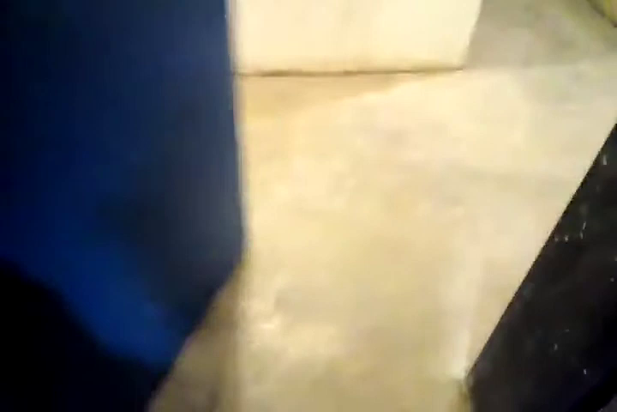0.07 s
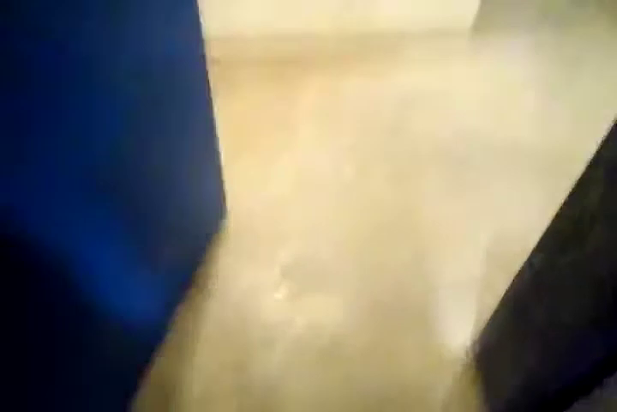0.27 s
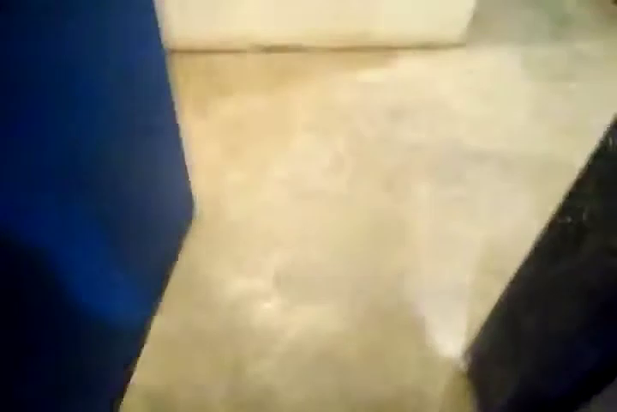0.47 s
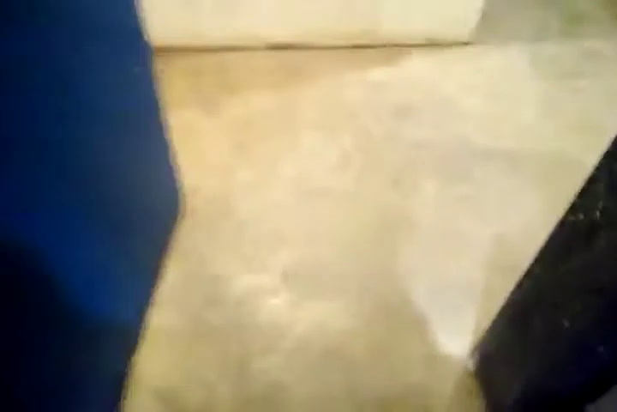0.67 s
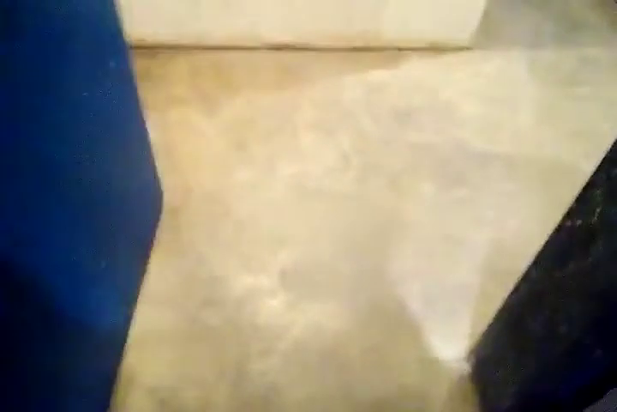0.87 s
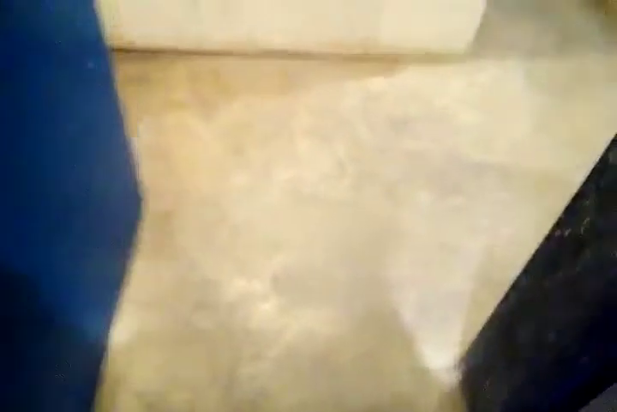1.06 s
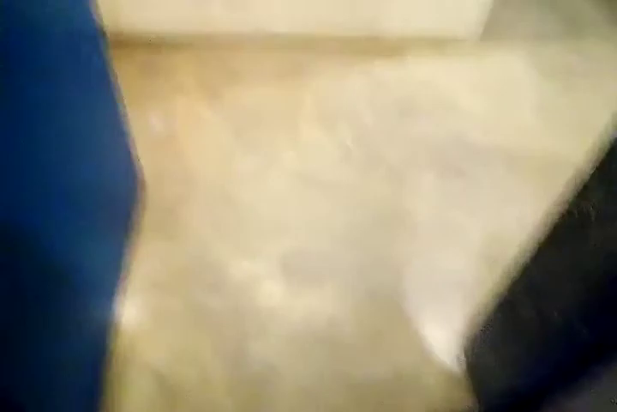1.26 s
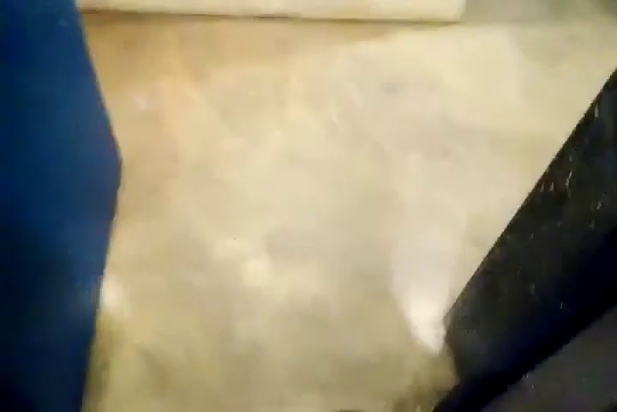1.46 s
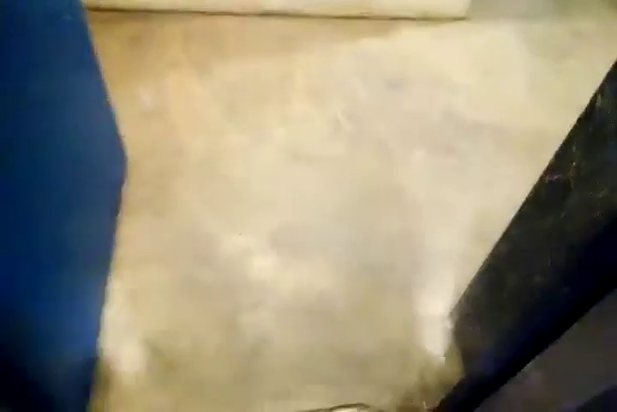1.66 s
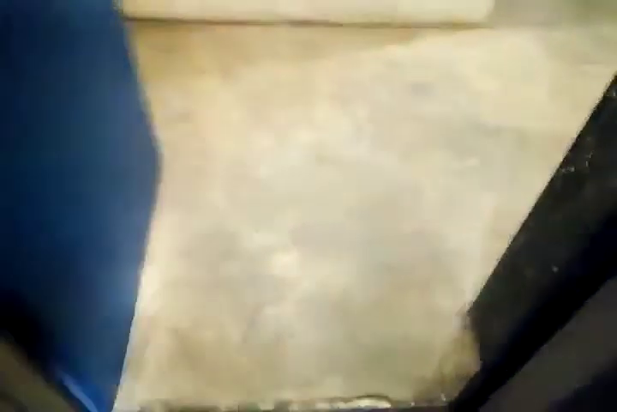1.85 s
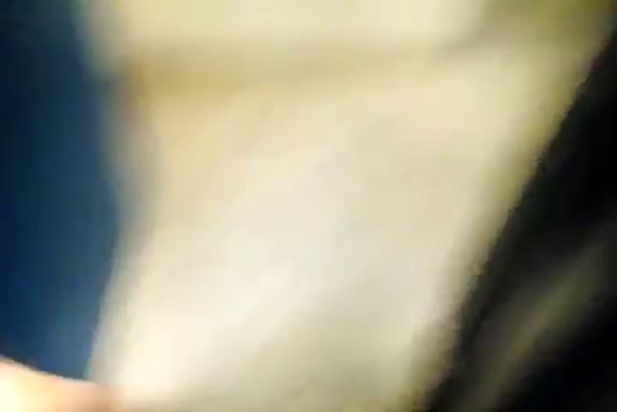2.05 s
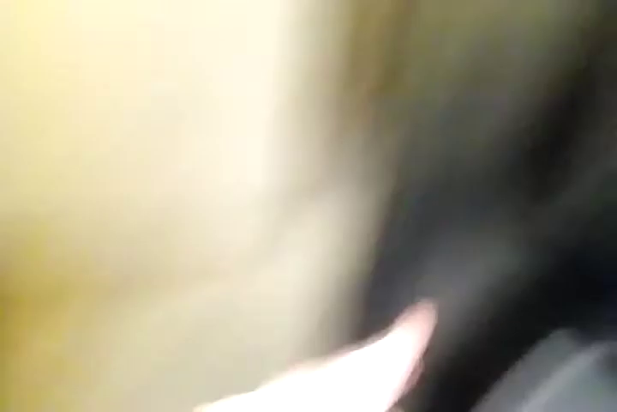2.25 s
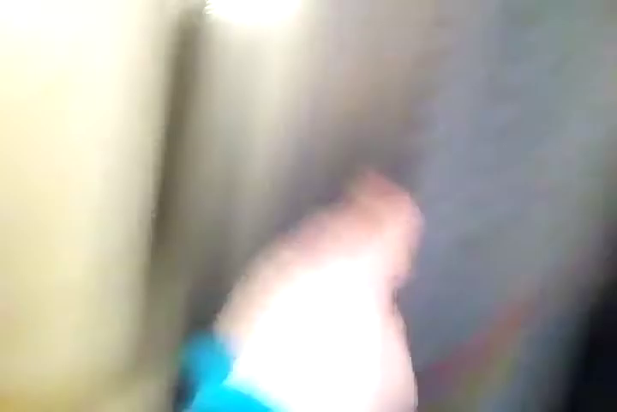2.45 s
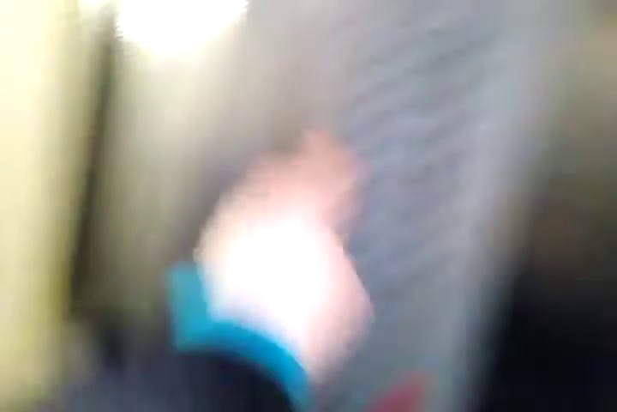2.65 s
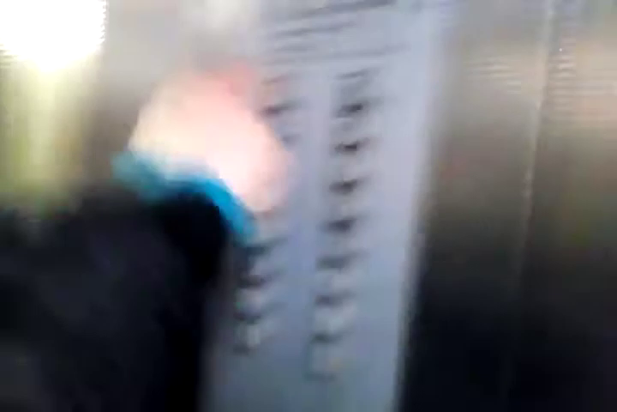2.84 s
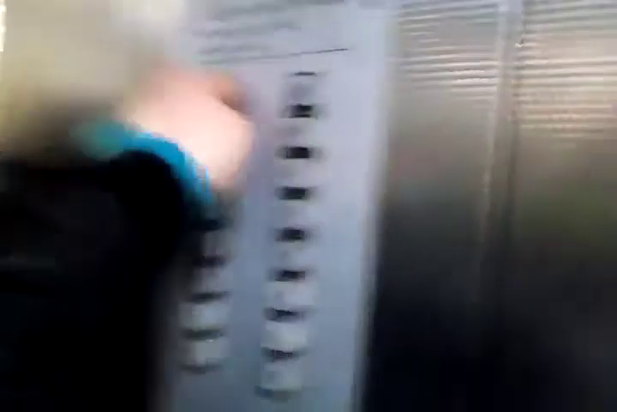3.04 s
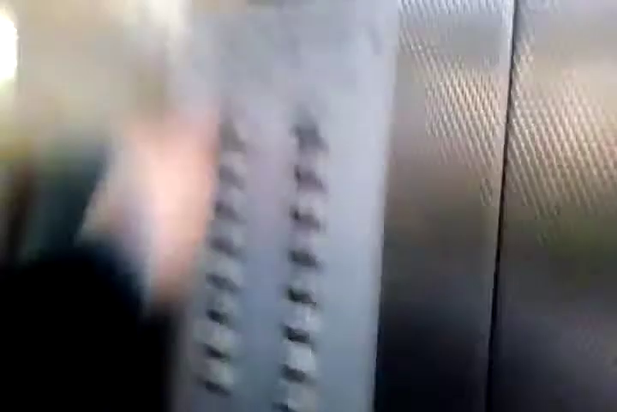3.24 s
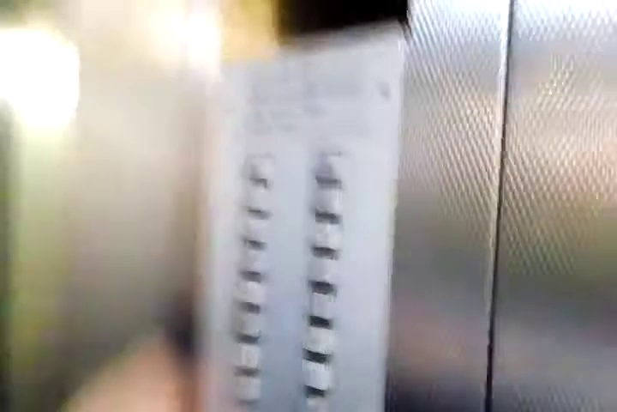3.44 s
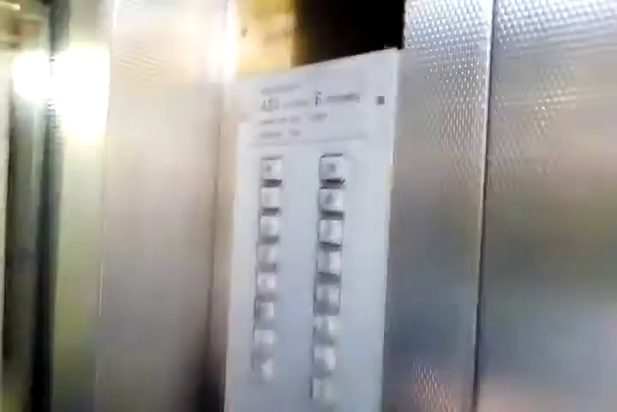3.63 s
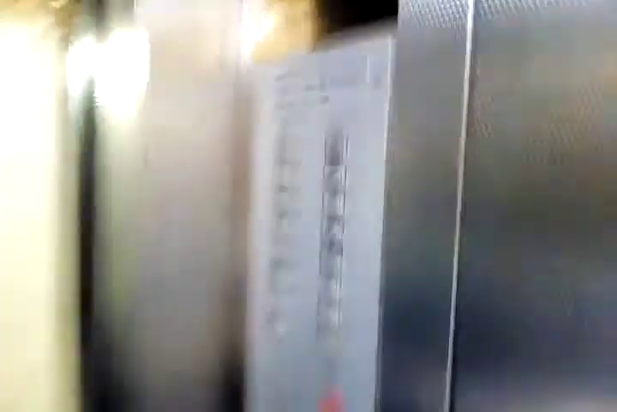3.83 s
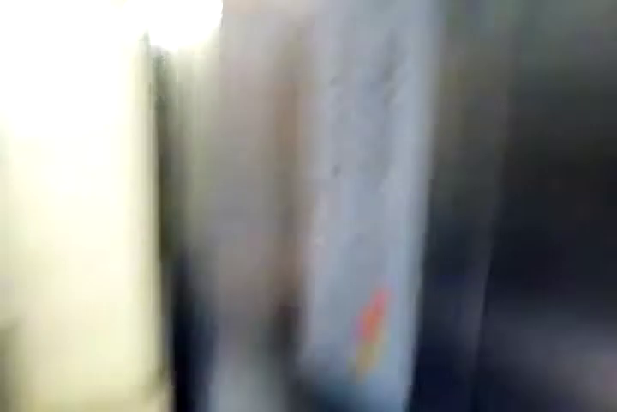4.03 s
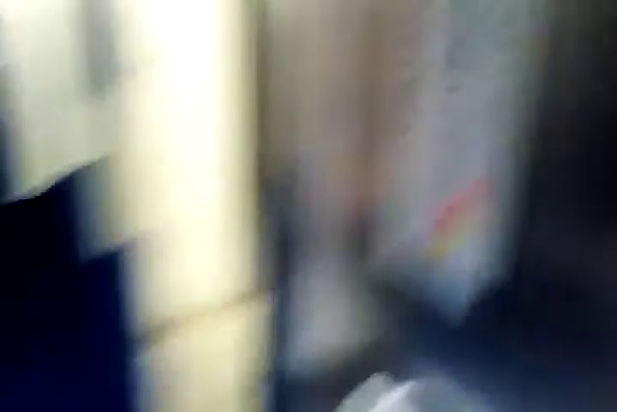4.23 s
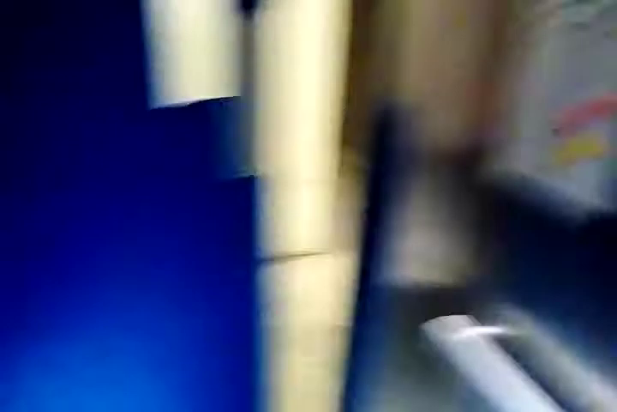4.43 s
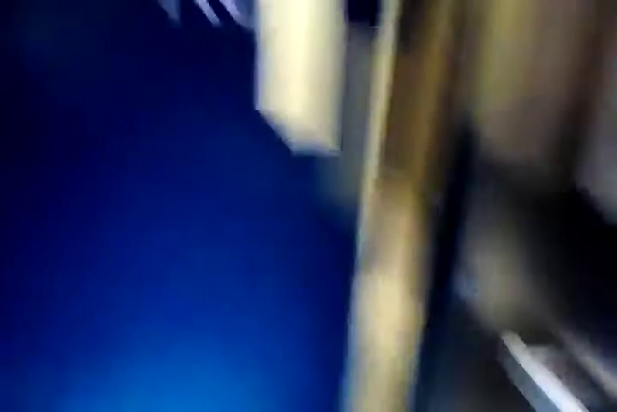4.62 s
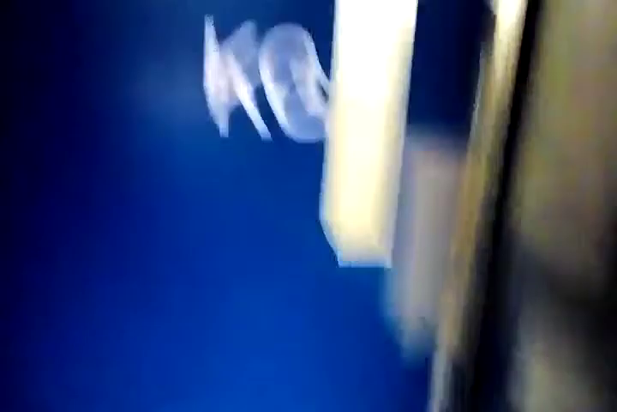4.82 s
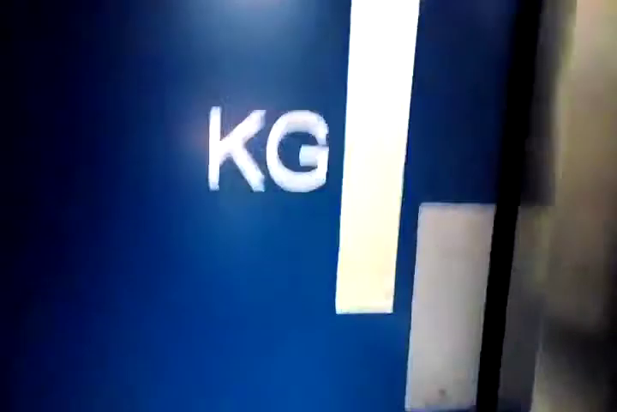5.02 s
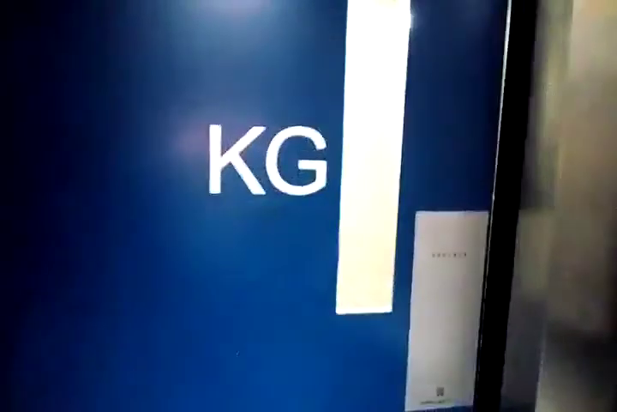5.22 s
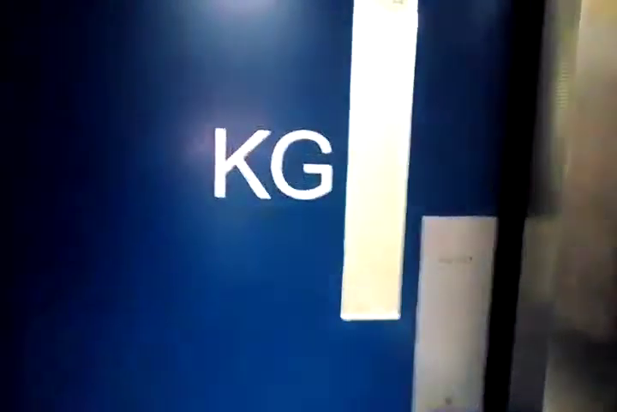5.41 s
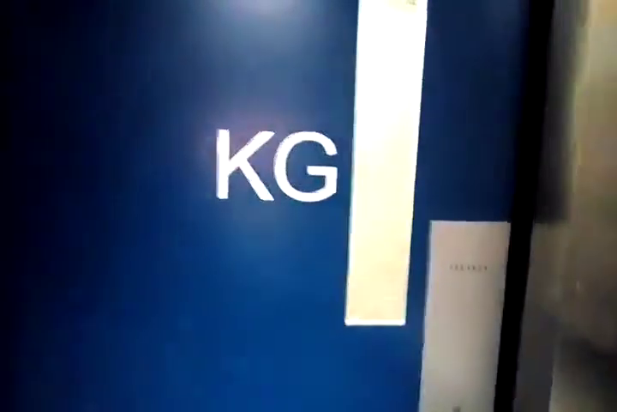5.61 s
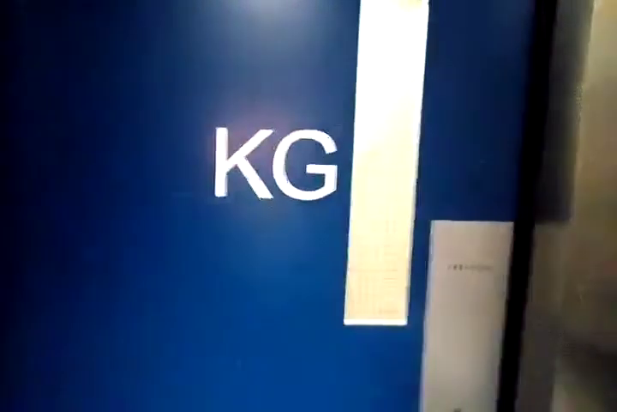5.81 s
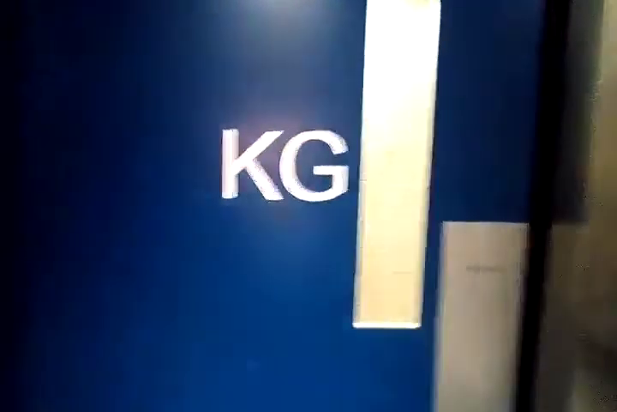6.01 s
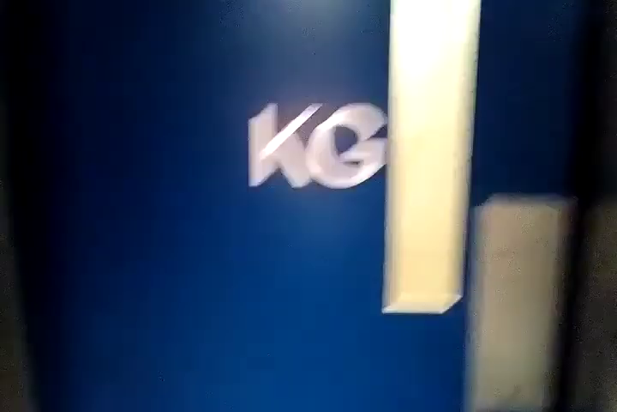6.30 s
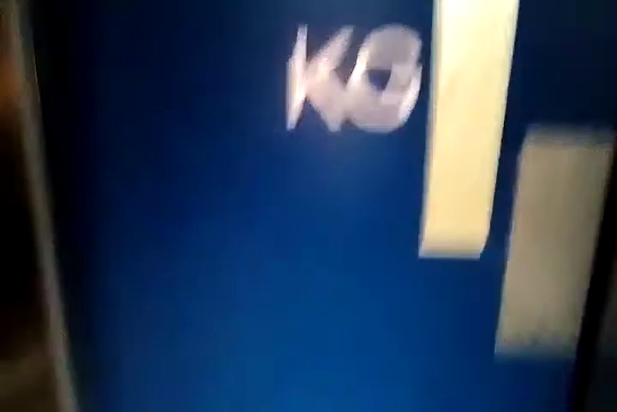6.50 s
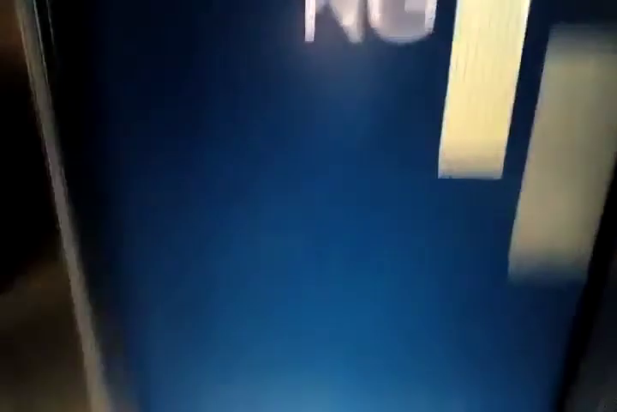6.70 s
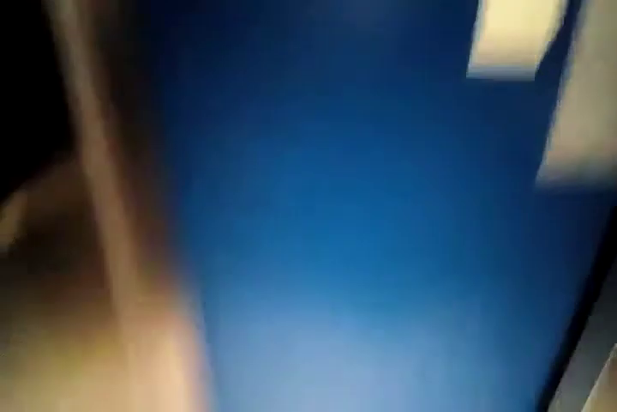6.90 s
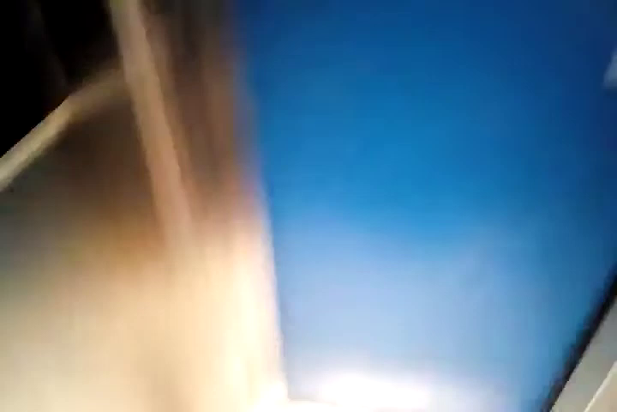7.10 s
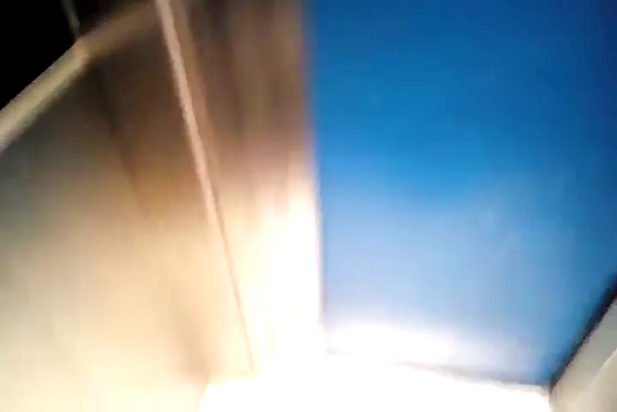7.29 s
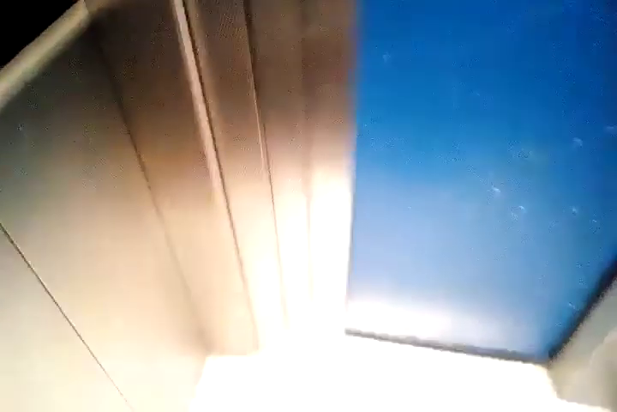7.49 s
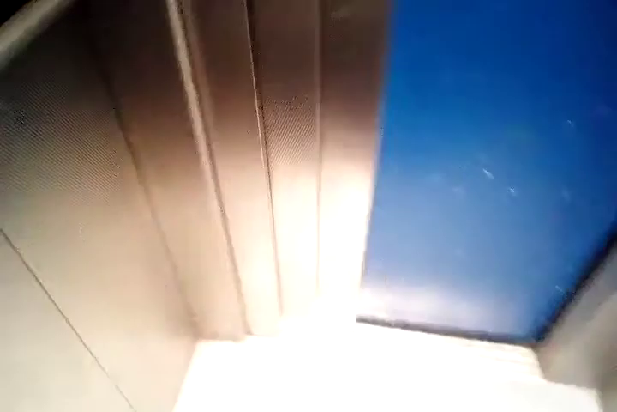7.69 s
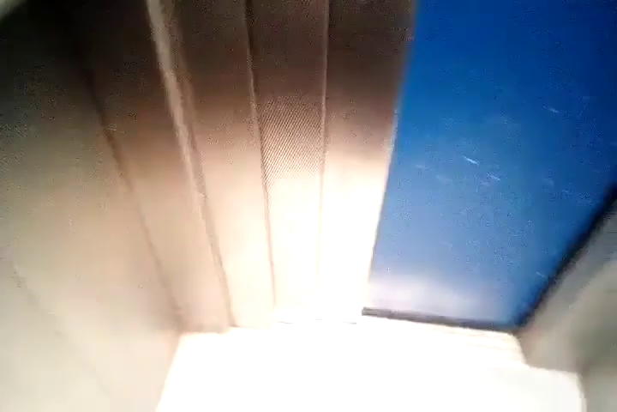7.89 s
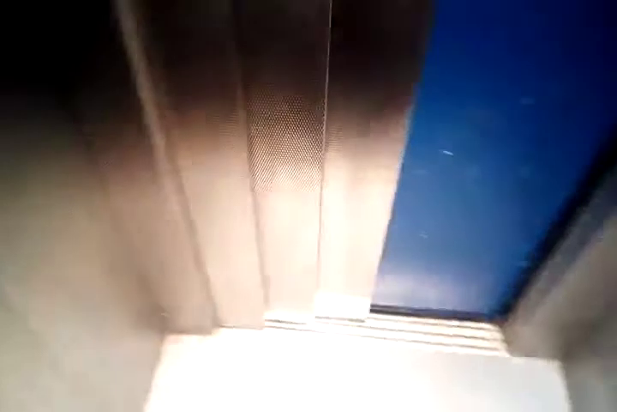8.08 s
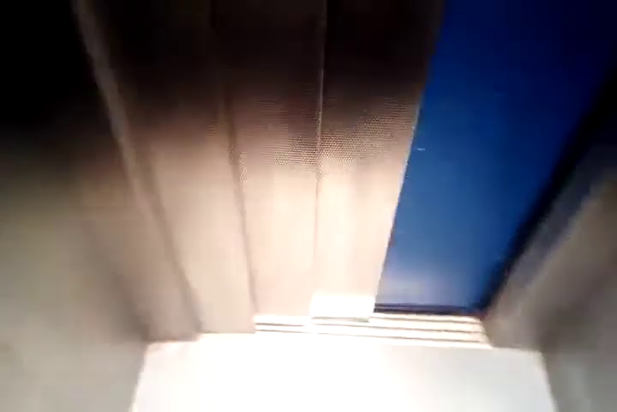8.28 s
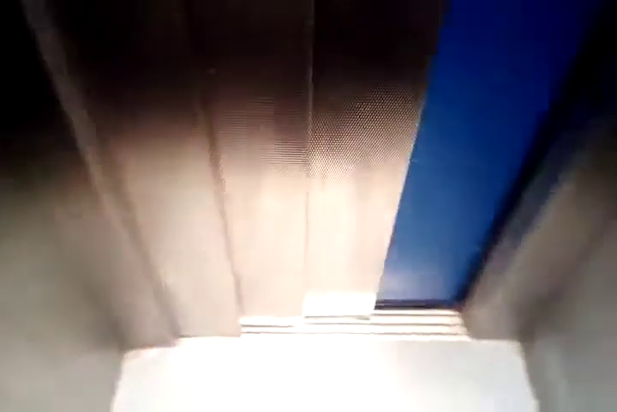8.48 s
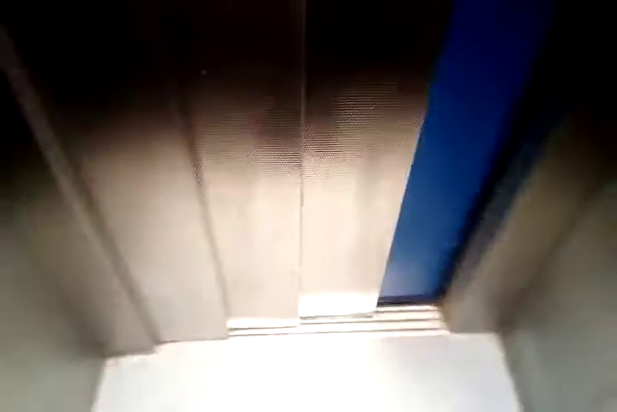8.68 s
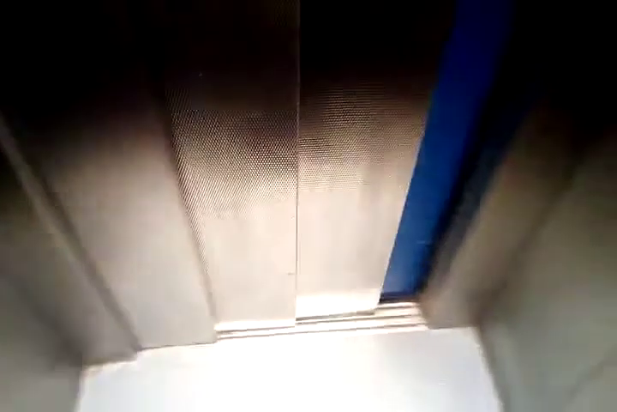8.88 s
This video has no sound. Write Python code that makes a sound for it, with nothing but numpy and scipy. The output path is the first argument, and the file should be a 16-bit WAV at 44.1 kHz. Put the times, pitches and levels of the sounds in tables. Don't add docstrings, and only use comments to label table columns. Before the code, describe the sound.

A lift's swing door rattles open, someone steps in and presses a button twice, the door slams, then folding metal panels clatter shut.

```python
import sys
import numpy as np
from scipy import signal
from scipy.fft import rfft, irfft, next_fast_len
from scipy.io import wavfile
from scipy.ndimage import uniform_filter1d

SR = 44100
rng = np.random.default_rng(int(sys.argv[2]) if len(sys.argv) > 2 else 0)


def master(y):
    cut = np.clip(np.atleast_2d(y).T, -1, 1)
    pcm = np.round(cut * 32767)
    wavfile.write(sys.argv[1], SR, pcm.astype(np.int16))


def field_ratio(decibels):
    return 10 ** (np.asarray(decibels, dtype=float) / 20)


N = 392931


def evened(x):
    return x / np.sqrt(np.mean(x ** 2) + 1e-30)


def smoothed(x, size):
    return uniform_filter1d(uniform_filter1d(x, size=size), size=size)


def read(points, hz):
    f, value = np.transpose(points)
    return np.interp(np.log(hz + 1), np.log(f + 1), value)


def add(mix, s, sound):
    part = mix[max(round(s * SR), 0):][:len(sound)]
    part += sound[:len(part)]


def coloured(x, gain):
    size = next_fast_len(len(x))
    return irfft(rfft(x, size) * gain(np.fft.rfftfreq(size, 1 / SR)), size)[:len(x)]


def band(hz, low_hz, high_hz):
    return 1 / np.sqrt((1 + (low_hz / (hz + 1)) ** 8) * (1 + (hz / high_hz) ** 8))


def resonances(hz, rings):
    return np.sqrt(1 + sum(field_ratio(2 * db) / (1 + ((hz - f) / width) ** 2) ** 2 for f, width, db in rings))


def ring(t, hz, db, t60):
    return field_ratio(db - 60 * t / t60) * np.sin(2 * np.pi * hz * t)


def peaked(sound, db):
    return field_ratio(db) * sound / np.sqrt(uniform_filter1d(sound ** 2, size=130).max() + 1e-30)


# (frequency [Hz], density [dB per Hz])
SELF_NOISE = [(5000, -14), (7500, -3), (9000, -5.5), (11000, -6), (13800, -4.5), (14800, 3.5), (15500, 4.5),
              (16500, -17)]
# (frequency [Hz], level [dB])
WHINE = [(12900, -103)]


def self_noise():
    noise = evened(coloured(rng.standard_normal(N), lambda f: field_ratio(read(SELF_NOISE, f))))
    t = np.arange(N) / SR
    return field_ratio(-83.5) * noise + sum(field_ratio(db) * np.sin(2 * np.pi * hz * t) for hz, db in WHINE)


REST_DB = (-74, -73, -74)
LINGER = (0.86, 0.87, 0.67)


def rumble(start, end, jolts, rings, lumpy_db, rise_s, settle_s):
    t = np.arange(start, end, 1 / SR)
    lumps = evened(smoothed(rng.standard_normal(len(t)), 500))
    shaking = rng.standard_normal(len(t)) * field_ratio(lumpy_db * lumps)
    body = coloured(shaking, lambda f: resonances(f, rings))
    bands = [coloured(body, lambda f: band(f, lo, hi)) for lo, hi in ((36, 130), (130, 300), (300, 900))]
    steady = [part / np.sqrt(smoothed(part ** 2, 3000) + 1e-12) for part in bands]
    settle = np.clip((end - t) / settle_s, .15, 1)
    power = field_ratio(REST_DB)[:, None] ** 2 * np.ones(len(t))
    for s, db, boom_db, clang_db, t60 in jolts:
        u = np.maximum(t - s, 0)
        fall_db = -60 * u / (max(t60, .1) * np.array(LINGER)[:, None])
        level_db = db + np.array([[boom_db], [0], [clang_db]]) + fall_db
        power = power + (settle * (1 - np.exp(-u / rise_s)) * field_ratio(level_db)) ** 2
    return (np.sqrt(power) * steady).sum(axis=0)


STAGE_S = [0, 1.36, 1.84, 4.83, 5.82, 6.642, 9.1]
SETTLE_S = (0.5, 0.059, 0.022, 0.043, 0.1, .07)
# (frequency [Hz], width [Hz], level over the wash [dB])
SWING_RINGS = [(49.6, 11, 11.5), (90, 12.5, 7.5), (154.3, 3, 8.5), (231.9, 2.7, 13), (347, 3.9, 1.5),
               (530, 30, 9), (722, 13, 1)]
STILL_RINGS = [(108, 4, 3.8), (238.9, 1.6, 12), (890, 6, 14)]
GRIP_RINGS = [(49.4, 24, 27.4), (95.3, 5.1, 27.1), (170.4, 13, 12.2)]
SLAM_RINGS = [(44, 16, 11), (157.3, 2.2, 15), (274, 27, 7.7), (325, 16, 12.5), (420, 33, 11.2),
              (530, 160, 6.8), (775, 28, 5.1)]
SLIDE_RINGS = [(42.7, 4.8, 14), (85.8, 4.2, 10.8), (168.6, 7.3, 11.1), (257.8, 14.6, 10.7), (299, 4.2, 4.7),
               (419, 155, 7.6), (548, 49, 3.7)]
# (time [s], body [dB], boom over body [dB], clang over body [dB], t60 [s])
SWING_JOLTS = [
    (0.0, -28.5, -3, -6.5, 0.39),
    (0.09, -39, -6, -4, 6.7),
    (0.51, -32, -9.5, -2.5, 0.54),
    (0.66, -52, -16, 9.5, 1.1),
    (0.95, -50.5, 5.5, -29, 2.9),
]
STILL_JOLTS = [
    (1.361, -58, -12, -9, 1),
]
GRIP_JOLTS = [(1.838, -42, -11, -28, 0.66), (2.04, -54, -4.5, -6.5, 3.7), (2.27, -74, 15, 2, 7.2),
              (2.86, -44, -21, -4.5, 0.81), (3.06, -71, 23, -13, 0.49), (3.18, -51, -4, 0, 0.8),
              (3.74, -68, 12, 3.5, 2.4), (4.05, -59.5, 2, -3.5, 2.65), (4.15, -57, -3, -16, 1.9),
              (4.26, -58, 0, -2, 0.88), (4.57, -65, 3, 7, 1), (4.73, -62.5, 19.5, 8, 2.6)]
SLAM_JOLTS = [
    (4.842, -34, -1, 11, 1.07),
    (4.938, -45.5, 15.5, -10, 0.69),
    (5.19, -40.5, 1, 4.5, 0.76),
    (5.40, -53.5, 6.5, 1.5, 2.3),
]
TURN_JOLTS = [
    (5.82, -68, 7.5, 6.1, 1.2),
    (6.15, -68.5, 28, 15, 1.26),
    (6.28, -73.5, 42, 32, 0.24),
]
SLIDE_JOLTS = [
    (6.645, -45, 8.5, 5, 5.6),
    (6.73, -26.5, -6, -14, 0.61),
    (7.052, -33.5, -1, -26, 0.65),
    (7.21, -35.5, 7, 10.5, 0.57),
    (7.349, -35.5, -3.5, -0.5, 1.07),
    (7.58, -50, 3, 5.5, 6.7),
    (7.781, -32.5, -6, 3, 0.68),
    (8.059, -66, -6, -16, 26),
    (8.42, -53.5, 5.5, -0.5, 5.4),
    (8.759, -46.5, 0, -19, 1.4),
]


def structure():
    out = np.zeros(N)
    jolts = (SWING_JOLTS, STILL_JOLTS, GRIP_JOLTS, SLAM_JOLTS, TURN_JOLTS, SLIDE_JOLTS)
    rings = (SWING_RINGS, STILL_RINGS, GRIP_RINGS, SLAM_RINGS, GRIP_RINGS, SLIDE_RINGS)
    lumpy_db = (1.1, 0.87, 1.0, 0.34, 0.62, 1.34)
    rise_s = (0.0095, 0.026, 0.027, 0.0093, 0.033, 0.029)
    for stage in zip(STAGE_S, STAGE_S[1:], jolts, rings, lumpy_db, rise_s, SETTLE_S):
        add(out, stage[0], rumble(*stage))
    return out


# (middle [s], level [dB], high over low hiss [dB], fade [s])
SLEEVE = [(0.15, -50, -26, 0.37), (0.62, -64.5, -7, 0.061), (1.951, -63, -8, 0.15), (2.05, -69, 7.5, 0.072),
          (2.3, -74, -3, 0.2), (2.6, -50.5, 0, 0.17), (3.0, -54.5, 4, 0.041), (3.17, -52, -2, 0.012),
          (3.28, -54, 3.5, 0.086), (3.45, -66.5, -5, 0.092), (3.8, -65.5, -19, 0.28),
          (4.07, -58.5, 0, 0.19), (4.62, -65, 8, 0.23), (5.015, -45.5, -9.5, 0.042),
          (5.15, -56.5, 8.5, .025), (1.4, -79, 2, 0.43), (5.209, -56, 3, 0.03), (5.37, -63, 13.5, 0.017),
          (5.61, -60, 2.5, 0.17), (5.85, -74, 16.5, 0.27), (6.402, -65.5, 4, 0.094),
          (6.61, -64.5, -8, 0.023)]
SCRAPE = [
    (6.83, -44, -4, 0.1),
    (7.03, -45, -20, 0.37),
    (7.27, -47.5, -4.5, 0.11),
    (7.43, -55.5, 5.5, 0.11),
    (7.67, -41.5, -23, 0.064),
    (7.84, -41, -0.5, 0.062),
    (8.03, -49, 1.5, 0.081),
    (8.37, -48, -3, 0.15),
    (8.73, -51, -24, 0.13),
]
AIR_DB = (-77.5, -78)


def strokes():
    t = np.arange(0, N / SR + .01, .002)
    slide_s = STAGE_S[-2]
    power = field_ratio(AIR_DB)[:, None] ** 2 * np.ones(len(t))
    for s, db, high_db, fade_s in SLEEVE + SCRAPE:
        swell = field_ratio([[db], [db + high_db]]) / np.cosh((t - s) / max(fade_s, .02))
        power = power + swell ** 2 * ((s < slide_s) | (t > slide_s))
    return [np.interp(np.arange(N) / SR, t, np.sqrt(p)) for p in power]


# (frequency [Hz], level [dB])
HISS = [(700, -0.5), (1300, 2), (2100, 3), (2900, -1.5), (4000, 2), (5800, 9.5), (7000, 5.5)]
# (frequency [Hz], width [Hz], level over the wash [dB])
SHAFT_RING = [(1995, 120, 2)]
RAIL_RINGS = [(2010, 440, 2.5), (3340, 230, -0.5), (4480, 67, 4.5), (6130, 1470, 2), (7860, 500, -1)]
# middle, half length [s]
SMOOTH_S = (2.55, .35)


def rustle():
    patchy_db, flicker_db, hop = 2.8, 1.4, 128
    frames, hz = N // hop + 5, np.fft.rfftfreq(512, 1 / SR)
    a, b, patches = rng.standard_normal((3, 257, frames))
    patches = evened(uniform_filter1d(uniform_filter1d(patches, size=3, axis=0), size=30, axis=1))
    frame_s = np.arange(frames) * hop / SR
    patches *= 1 - .7 * np.exp(-((frame_s - SMOOTH_S[0]) / SMOOTH_S[1]) ** 4)
    flicker = evened(uniform_filter1d(rng.standard_normal(frames), size=5))
    z = (a + 1j * b) * field_ratio(read(HISS, hz)[:, None] + patchy_db * patches + flicker_db * flicker)
    shaft, slide = round(3.6 * SR / hop), round(STAGE_S[-2] * SR / hop)
    z[:, shaft:slide] *= resonances(hz, SHAFT_RING)[:, None]
    z[:, slide:] *= resonances(hz, RAIL_RINGS)[:, None]
    hiss = signal.istft(z, nperseg=512, noverlap=384)[1][:N]
    hiss /= np.sqrt(uniform_filter1d(hiss ** 2, size=8000))
    bands = [evened(coloured(hiss, lambda f: band(f, lo, hi))) for lo, hi in ((650, 3200), (3200, 7300))]
    return sum(gain * part for gain, part in zip(strokes(), bands))


# (time [s], peak [dB], knock [dB])
THUMPS = [(0.961, -46.5, 3), (1.848, -54, -9), (2.05, -49, -2), (2.154, -41.5, -13), (2.799, -43, -11),
          (3.187, -49, 1.5), (3.751, -52, -19), (4.283, -44.5, -35), (5.326, -38, -6), (6.163, -46.5, -6),
          (6.319, -42, -15)]


def thumps():
    out, t = np.zeros(N), np.arange(8192) / SR
    shape = (1 - np.exp(-t / 0.00076)) * np.exp(-(t / 0.07) ** 2)
    for s, db, knock_db in THUMPS:
        push = coloured(rng.standard_normal(8192), lambda f: band(f, 50, 390)) * shape
        knock = coloured(rng.standard_normal(8192), lambda f: band(f, 400, 580)) * shape
        add(out, s - .003, peaked(push, db - 4.0) + peaked(knock, db + knock_db + 0.5))
    return out


def wavering(rows):
    s, hz, *levels = np.transpose(rows)
    t = np.arange(s[0], s[-1], 1 / SR)
    phase = 2 * np.pi * np.cumsum(np.interp(t, s, hz)) / SR
    tone = sum(field_ratio(np.interp(t, s, db)) * np.sin((k + 1) * phase) for k, db in enumerate(levels))
    tone *= field_ratio(2.1 * evened(smoothed(rng.standard_normal(len(t)), 1500)))
    return np.sqrt(2) * tone * signal.windows.tukey(len(t), .04)


HUM_HZ = 220.7
# (time [s], frequency [Hz], level [dB], octave [dB])
HUM = [(0.02, HUM_HZ, -44, -45), (0.12, HUM_HZ, -44, -50.5), (0.32, HUM_HZ, -42.5, -39.5),
       (0.42, HUM_HZ, -45, -42), (0.58, HUM_HZ, -40, -40.5), (0.798, HUM_HZ, -47, -47),
       (0.9, HUM_HZ, -67, -58), (1.1, HUM_HZ, -75, -62.5), (1.37, HUM_HZ, -89, -82)]
# (time [s], frequency [Hz], level [dB])
BOOM = [
    (4.86, 90, -37.5),
    (5.068, 90, -28),
    (5.11, 89, -53),
    (5.146, 88.1, -33.5),
    (5.804, 90, -53.5),
    (5.83, 88, -50),
]


def leaf_tones():
    out = np.zeros(N)
    for rows in (HUM, BOOM):
        add(out, rows[0][0], wavering(rows))
    return out


def peals(rows):
    out = np.zeros(N)
    for s, hz, db, hold_s in rows:
        t = np.arange(0, 3 * hold_s, 1 / SR)
        phase = 2 * np.pi * np.cumsum(hz * (1 + 0.016 * (.5 - t / hold_s))) / SR
        swell = (1 - np.exp(-t / (0.16 * hold_s))) * np.exp(-(t / hold_s) ** 3)
        add(out, s, field_ratio(db + 4) * swell * np.sin(phase))
    return out


# (time [s], frequency [Hz], level [dB], hold [s])
STEP_PEALS = [(0.55, 154, -38, .06), (0.91, 147, -44.5, 0.082), (1.846, 170, -46, 0.087),
              (1.9, 53, -54, 0.09), (2.05, 604, -58, 0.038), (2.15, 173, -47, 0.057),
              (2.24, 52.7, -51, 0.079), (2.5, 57, -54, 0.099), (2.796, 162.5, -48.5, .08),
              (2.799, 345.6, -53, 0.055), (2.9, 182, -48.5, 0.077), (2.931, 375, -54.5, 0.059),
              (2.893, 1040, -48, 0.036), (3.191, 940, -38.5, 0.013), (3.2, 193, -49.5, 0.05),
              (3.2, 384, -54, 0.07), (0.57, 580, -58, 0.31), (1.19, 740, -76, 0.16),
              (4.27, 327, -54.5, 0.11), (4.579, 326, -61, 0.098), (3.3, 408, -61.5, .07),
              (3.3, 800, -63, 0.1), (3.74, 65.4, -49.5, 0.063), (3.87, 150.5, -58.5, 0.072),
              (4.129, 96, -50, .05), (4.23, 340, -57, 0.037), (4.24, 90, -52, .05),
              (4.32, 94.7, -52, 0.067), (4.15, 160.5, -60, .1), (6.17, 329, -53.5, 0.05),
              (5.6, 320, -56.5, 0.079), (0.55, 360, -53, 0.25), (0.8, 243.5, -49.5, 0.36),
              (0.2, 630, -47, .1)]
SLAM_PEALS = [(4.79, 94.5, -40, 0.062), (4.845, 507, -28, 0.049), (4.85, 321.4, -38, 0.083),
              (4.865, 411, -35, 0.044), (4.905, 550, -30.5, 0.031), (4.925, 434, -32.5, 0.058),
              (5.04, 426, -39, 0.083), (5.2, 432, -47, 0.074), (5.22, 345, -40.5, 0.036),
              (5.32, 413, -46.5, 0.08), (5.32, 335, -40, 0.035), (5.322, 584, -38.5, 0.015)]
SLIDE_PEALS = [(6.645, 133, -41, 0.049), (6.674, 101, -37, 0.13), (6.725, 420, -31, 0.041),
               (6.75, 247, -30.5, 0.081), (6.839, 94, -33, 0.092), (6.93, 747, -29, 0.027),
               (6.944, 244, -39, 0.038), (6.734, 2406, -31, 0.013), (6.766, 2260, -32, 0.0098),
               (7.054, 977, -29, 0.018), (7.389, 2190, -29, 0.025), (7.06, 253, -32, .125),
               (6.748, 95, -31, .05), (7.062, 55, -32, .05), (6.97, 60.3, -32.5, 0.031),
               (7.053, 1610, -35.5, 0.038), (7.225, 530, -30.5, 0.053), (7.501, 44.8, -38, 0.069),
               (7.791, 420, -36, 0.05), (8.372, 178.5, -52.5, 0.059), (8.49, 504, -45.5, .05),
               (8.6, 110, -44, 0.047), (8.74, 243, -48, .06), (8.81, 95, -47, 0.054)]


def structure_modes():
    return peals(STEP_PEALS + SLAM_PEALS + SLIDE_PEALS)


def ticks(rows, shared, low_hz, high_hz, own_db, width_hz, t60, trim_db, bounce=0.):
    out, t = np.zeros(N), np.arange(4096) / SR
    for s, db in rows:
        own_hz = rng.uniform(low_hz, high_hz)
        rings = [(f * (1 + 0.021 * rng.standard_normal()), width_hz, level) for f, level in shared]
        rings.append((own_hz, width_hz, own_db))
        puff = coloured(rng.standard_normal(4096), lambda f: band(f, 1100, 13000) * resonances(f, rings))
        tick = peaked(puff * (1 - np.exp(-t / 0.00083)) * field_ratio(-60 * t / t60), db + trim_db)
        add(out, s - .001, tick)
        add(out, s + .013, bounce * tick)
    return out


# (time [s], peak [dB])
RELAY = [(5.4076, -37), (5.574, -30.5), (5.6328, -34), (5.684, -35), (6.0844, -36), (6.1624, -46),
         (6.2536, -36), (6.3421, -37), (6.4288, -41)]


def relay():
    return ticks(RELAY, [(2320, 17), (5770, 0)], 4020, 4120,
                 own_db=28, width_hz=140, t60=.03, trim_db=-9.5, bounce=.35)


# (time [s], peak [dB])
RAIL = [(8.0174, -31.5), (8.0546, -33), (8.0966, -28.5), (8.1424, -35), (8.1868, -31.5), (8.2322, -30),
        (8.2805, -35), (8.3257, -30.5), (8.3604, -36), (8.3997, -29.5), (8.4394, -31.5), (8.561, -37),
        (8.6068, -36.5), (8.6536, -36.5), (8.739, -38.5)]


def rail():
    return ticks(RAIL, [(2150, 9), (3120, 6), (4350, 8), (6050, 8), (7600, 10)], 2000, 7500,
                 own_db=8, width_hz=220, t60=.14, trim_db=-5)


# (frequency [Hz], level [dB], t60 [s])
SHEET = [(595, -10, 0.16), (771, -2, 0.11), (939, -8, 0.11), (1177, -15.5, 0.16), (1670, -8, 0.11),
         (2140, -4, 0.065), (2310, -13, .08), (3200, -27, 0.063), (3450, -1, 0.095)]


def knocks(rows, sheet_db, ring_db, ring_t60, rise, fade, cut, air_db, trim_db, rattle_s):
    out, t = np.zeros(N), np.arange(8192) / SR
    edges_hz = (350, 1400), (1400, 3400), (3400, 8500), (8500, 20000)
    for s, db, body_db, edge_db, hz in rows:
        longer = np.exp(0.011 * (-20.0 - db))
        u = t / np.clip(rattle_s * longer, .0005, .05)
        grain = field_ratio(1.8 * evened(uniform_filter1d(rng.standard_normal(8192), size=90)))
        swell = (1 - np.exp(-u / rise)) * grain
        contacts = rng.standard_normal(8192) * swell * np.exp(-2 * u)
        detune = 1 + 0.018 * rng.standard_normal(len(SHEET))
        sheet = sum(ring(t, f * d, level, t60) for (f, level, t60), d in zip(SHEET, detune))
        modes = field_ratio(sheet_db) * sheet + ring(t, hz, ring_db, ring_t60)
        rings = signal.fftconvolve(contacts, modes)[:8192]
        crack = rng.standard_normal(8192) * swell * np.exp(-(u / fade) ** cut)
        shifted = [(f * rng.uniform(0.886, 0.99), width, level) for f, width, level in RAIL_RINGS]
        sound = coloured(crack, lambda f: resonances(f, shifted)) + rings / np.linalg.norm(contacts)
        levels_db = body_db, 0, edge_db, edge_db + air_db
        knock = np.zeros(8192)
        for edge, level in zip(edges_hz, levels_db):
            knock += peaked(coloured(sound, lambda f: band(f, *edge)), level)
        add(out, s - .001, field_ratio(db + trim_db) * knock * np.clip((t[-1] - t) / .01, 0, 1))
    return out


# (time [s], peak [dB], body [dB], edge [dB], loudest ring [Hz])
CLACKS = [(0.256, -38, -3, -8, 2200), (0.296, -40, 0, -2, 1490), (0.501, -49, -11, 0, 2970),
          (6.698, -42, -4, -7.5, 3850), (6.7335, -20, -15, -13, 2320), (6.790, -29, -13, -9, 2250),
          (6.883, -30, -27, -5, 2960), (6.9215, -24.5, 4, -1, 2300), (6.998, -43, -12, 9, 6000),
          (7.157, -42, -9, 13.5, 6600), (8.018, -33, -10, -2, 2100), (8.7136, -48, -5, -8, 4300),
          (8.7745, -45, -10, 2, 5840), (8.851, -45, -10, 8, 5500), (8.898, -43, -16.5, 0, 2200)]
SNAPS = [
    (3.18, -49, -6, 4, 4930),
    (4.854, -38.5, 17.5, 15, 600),
    (5.186, -50, -8, 17, 5500),
    (7.687, -35.5, -14, 10.5, 5600),
    (8.3975, -40, -12, 2, 4260),
]


def clacks():
    dry_ones = knocks(CLACKS, sheet_db=-18, ring_db=-1.5, ring_t60=0.042, rise=0.17, fade=2.5, cut=0.67,
                      air_db=-6, trim_db=-9, rattle_s=0.0023)
    return dry_ones + knocks(SNAPS, sheet_db=-30, ring_db=-8, ring_t60=0.03, rise=0.15, fade=3.5, cut=0.97,
                             air_db=3, trim_db=-5.5, rattle_s=0.0042)


LATCH = [
    (0.0045, -23, -7, 1, 2496),
    (0.052, -26, -15, -3.5, 2130),
    (0.1688, -27.5, 4, 3, 1400),
    (0.218, -30.5, -5, -12.5, 1690),
    (0.3075, -29, -11, -10, 3400),
    (0.322, -26, -4.5, -2, 1904),
    (0.5142, -25, -18, -7, 1957),
    (0.820, -47, 3.5, 1.5, 2500),
    (0.9646, -61.5, 12, 0, 1390),
]


def latch():
    return knocks(LATCH, sheet_db=-24.0, ring_db=-9.5, ring_t60=0.095, rise=0.11, fade=4.5, cut=0.64,
                  air_db=-2.0, trim_db=-5.5, rattle_s=0.0025)


BUTTON = [
    (2.892, -29, -4.5, 10, 5770),
    (3.1908, -43.5, 11, 23.5, 6950),
    (4.0653, -49.5, -1, -6, 6040),
]
# (time [s], frequency [Hz], level [dB], hold [s])
BUTTON_PEALS = [
    (2.8925, 3960, -27.5, 0.011),
    (3.191, 4020, -33, 0.012),
    (3.053, 2080, -52, .006),
]


def button():
    clicks = knocks(BUTTON, sheet_db=-20.5, ring_db=-5.5, ring_t60=0.019, rise=0.12, fade=6.2, cut=0.84,
                    air_db=6.5, trim_db=-2.5, rattle_s=0.0018)
    return clicks + peals(BUTTON_PEALS)


SLAM = [
    (4.8388, -34.5, -4, 4, 1230),
    (4.8448, -32, 9, -2.5, 467),
    (4.9824, -53, 24, 1, 530),
    (5.128, -64, 24, -4, 533),
    (5.3273, -62, 19.5, 1, 576),
    (5.651, -45, -35, 4, 5170),
    (6.0418, -60.5, -30, 5, 5430),
]


def slam():
    return knocks(SLAM, sheet_db=-11.0, ring_db=1.5, ring_t60=0.025, rise=0.18, fade=6.2, cut=1.34,
                  air_db=12.0, trim_db=-3.5, rattle_s=0.0059)


PANELS = [(6.6503, -33, 0, -2.5, 3800), (6.8748, -26, -37, -5, 2250), (6.9292, -21, 2.5, -6, 1025),
          (7.0524, -19.5, 8.5, -23, 1016), (7.1374, -57, 22, 26, 1300), (7.2315, -17.5, -24, -10, 2240),
          (7.3604, -53, -22, 4, 850), (7.3844, -22.5, -27, -7, 2200), (7.5974, -37, -16, -1.5, 2130),
          (7.9944, -33, -4.5, -4, 920), (8.5036, -31, -7.5, -9, 2500)]
SHUDDERS = [(3.1335, -58, 2, -18, 1750), (5.1869, -42.5, 7.5, 5, 1510), (6.3135, -57, 12, 5, 564),
            (6.6914, -33, 4.5, -4, 610), (6.7256, -25, 0, -1, 2290), (6.7652, -24.5, -3.5, -6.5, 2300),
            (6.7949, -35.5, 9.5, -4.5, 630), (7.2200, -33, 6.5, 4, 2240), (7.2444, -31.5, 4.5, -13, 890),
            (7.3926, -23.5, -12.5, -12.5, 2140), (7.637, -39.5, -0.5, 0, 2540),
            (7.6895, -31.5, -9, 0.5, 2100), (7.7841, -34, 4.5, 6.5, 870), (7.8037, -24, 1, 4.5, 2224),
            (7.8394, -39, -10, 2, 2280), (8.8058, -28.5, -20, -15, 2007), (7.072, -42, 1, -9, 1010),
            (6.957, -42, 3, -7, 1450), (7.2, -35, 4.5, -1, 910)]


def panels():
    strikes = knocks(PANELS, sheet_db=-16.0, ring_db=-0.5, ring_t60=0.044, rise=0.17, fade=6.3, cut=1.9,
                     air_db=-8.0, trim_db=-6.5, rattle_s=0.0048)
    return strikes + knocks(SHUDDERS, sheet_db=-11.0, ring_db=-4.0, ring_t60=0.035, rise=0.63, fade=2.6,
                            cut=1.57, air_db=-7, trim_db=-3.5, rattle_s=0.01)


# (frequency [Hz], t60 [s])
CABIN = [(300, 0.44), (1500, 0.26), (4500, 0.23), (9000, 0.22)]


def cabin(x):
    hz, t, z = signal.stft(rng.standard_normal(SR // 2), SR, nperseg=256)
    tail = signal.istft(z * field_ratio(-60 * t / read(CABIN, hz)[:, None]), SR, nperseg=256)[1]
    tail *= np.clip(np.arange(len(tail)) / SR / 0.0017, 0, 1)
    return signal.fftconvolve(x, tail / np.linalg.norm(tail))[:N]


def scene():
    low = structure() + thumps() + leaf_tones() + structure_modes()
    hits = relay() + rail() + clacks() + latch() + button() + slam() + panels()
    return (rustle() + low + hits + field_ratio(-9.0) * cabin(hits))[None]


# (frequency [Hz], gain [dB])
MICROPHONE = [(20, -0.5), (6300, -6), (7000, -14), (8000, -27), (10000, -37.5), (13000, -52), (14600, -40),
              (17000, -48)]


def microphone(x):
    return coloured(x, lambda f: field_ratio(read(MICROPHONE, f)))


def roll_off(x):
    return signal.sosfilt(signal.butter(12, 15550, fs=SR, output="sos"), x)


def record(dry):
    mix = (microphone(dry[0]) + self_noise())[None]
    return roll_off(mix)


dry = scene()
out = record(dry)
master(out)
```